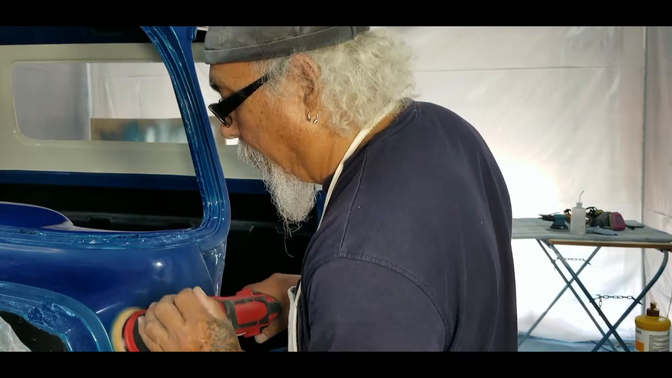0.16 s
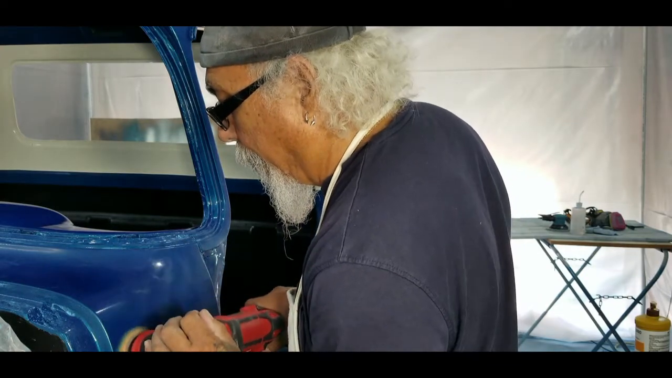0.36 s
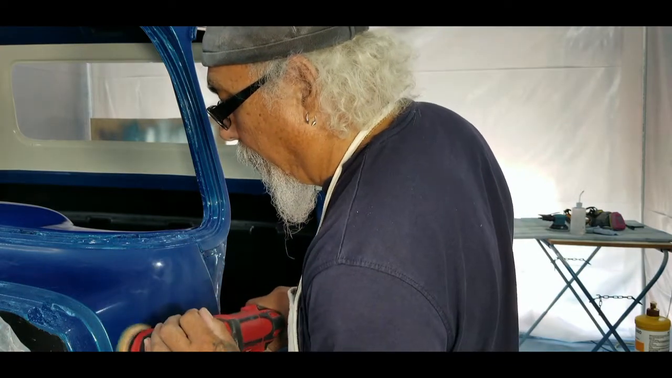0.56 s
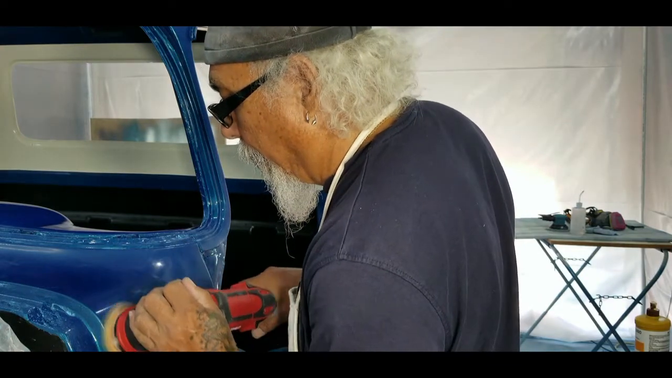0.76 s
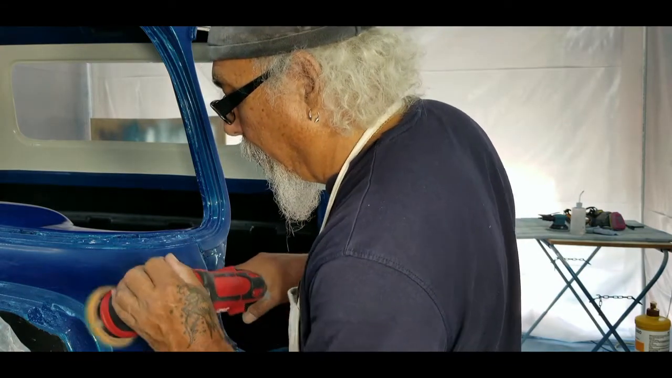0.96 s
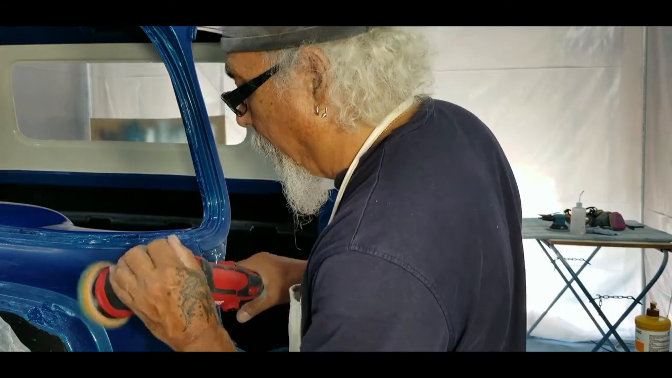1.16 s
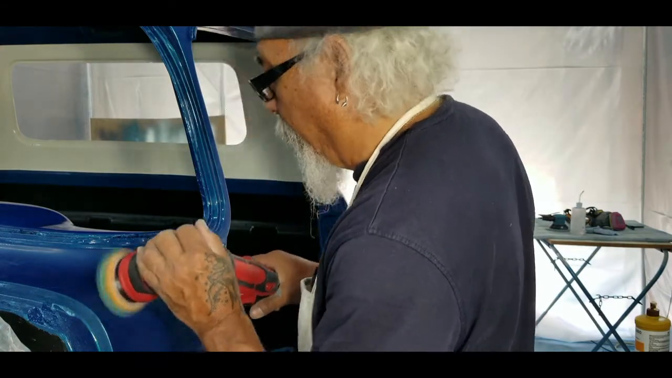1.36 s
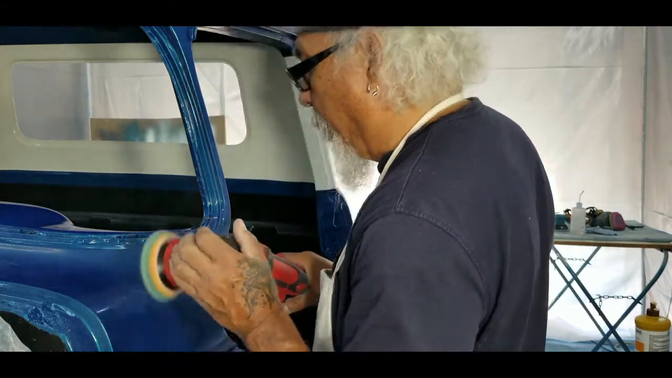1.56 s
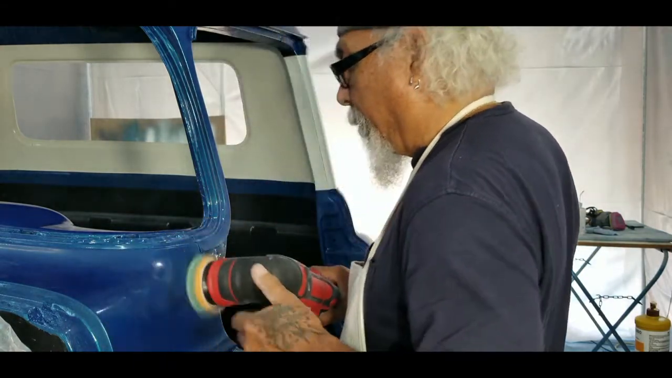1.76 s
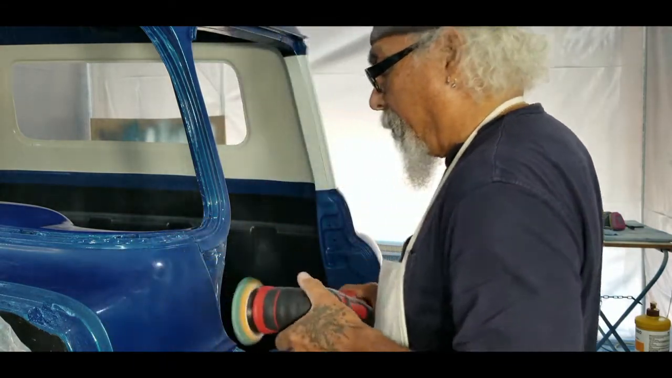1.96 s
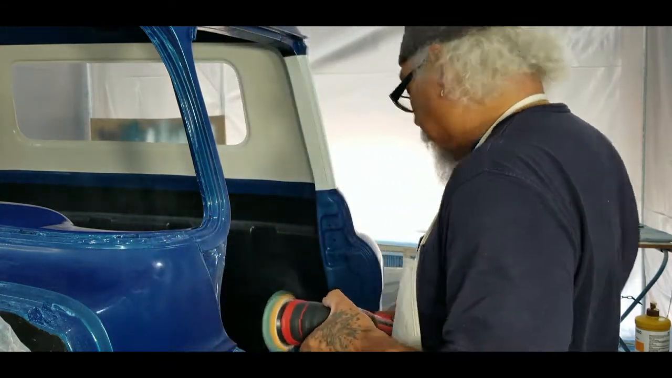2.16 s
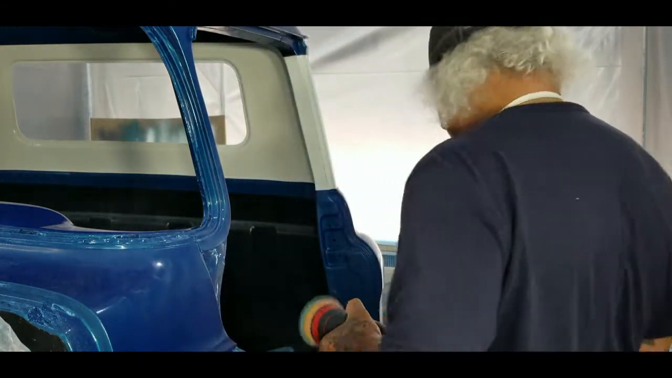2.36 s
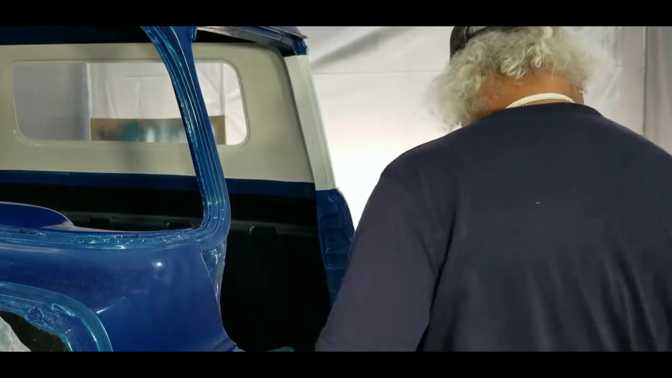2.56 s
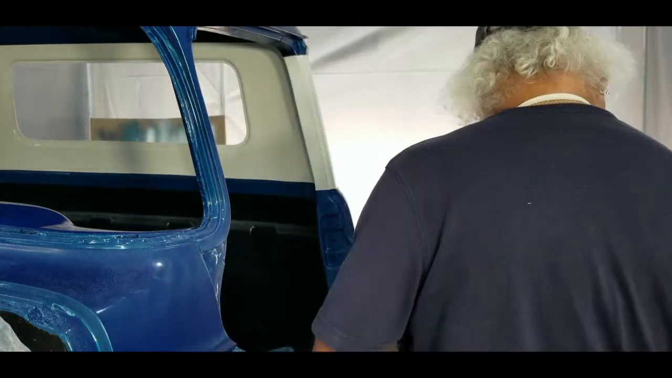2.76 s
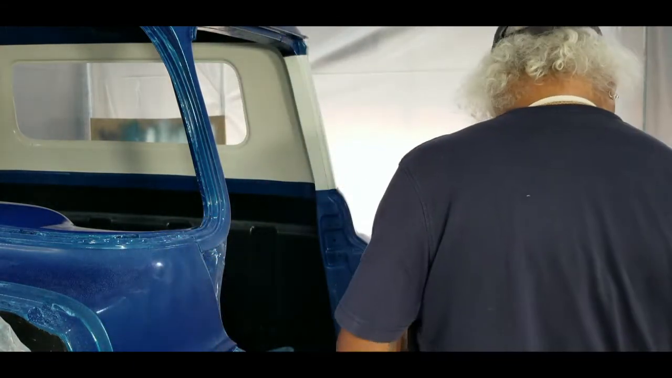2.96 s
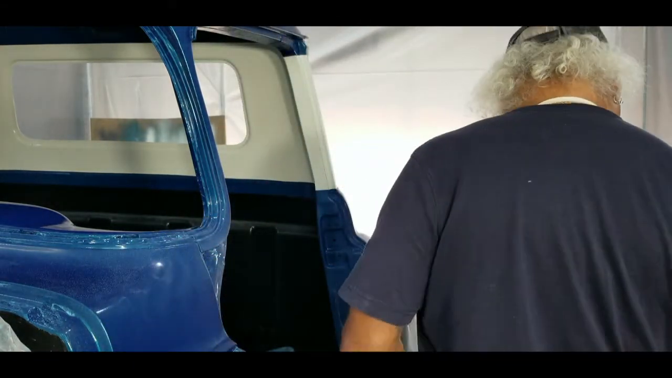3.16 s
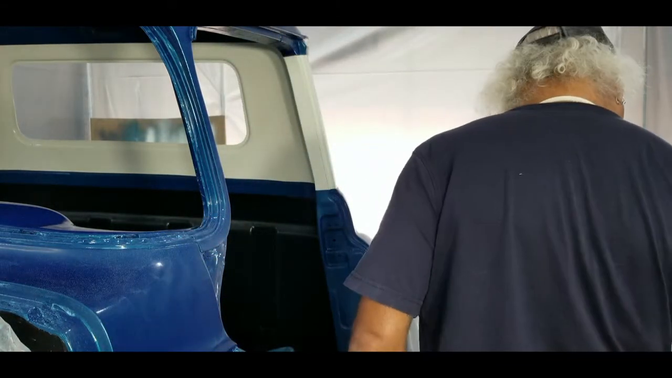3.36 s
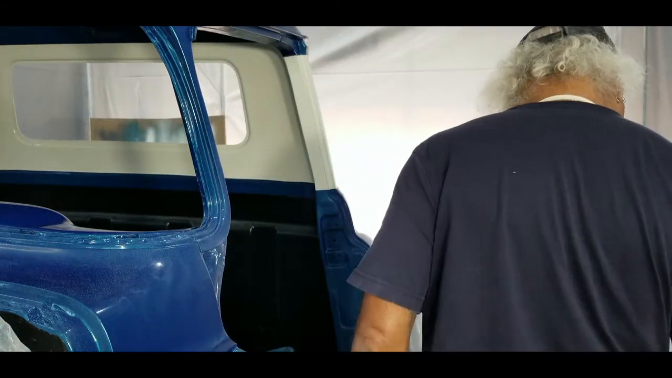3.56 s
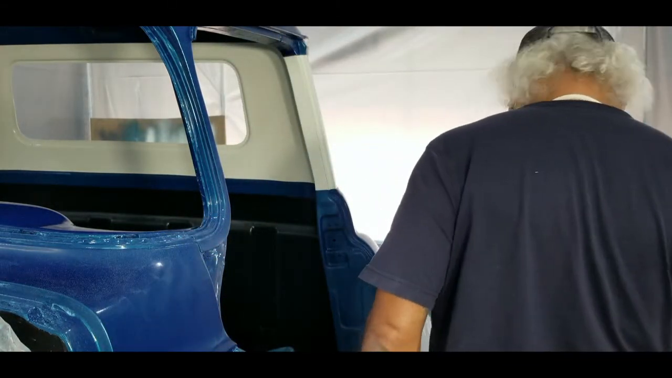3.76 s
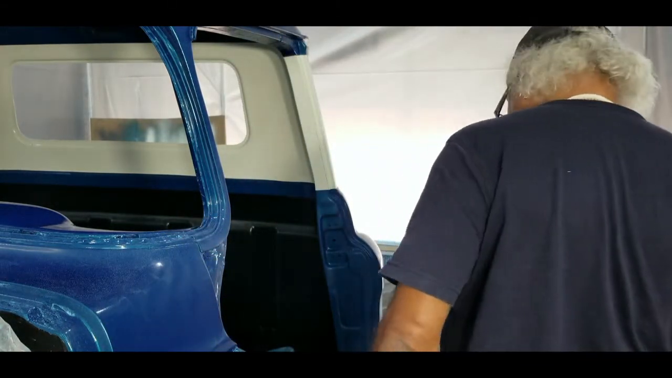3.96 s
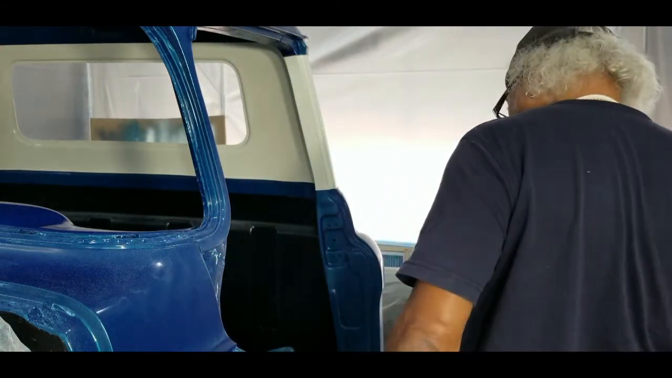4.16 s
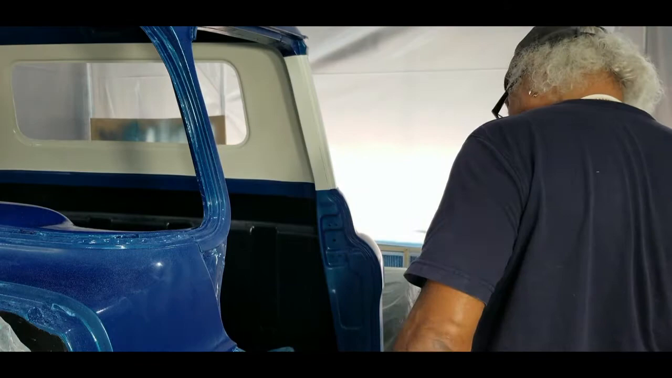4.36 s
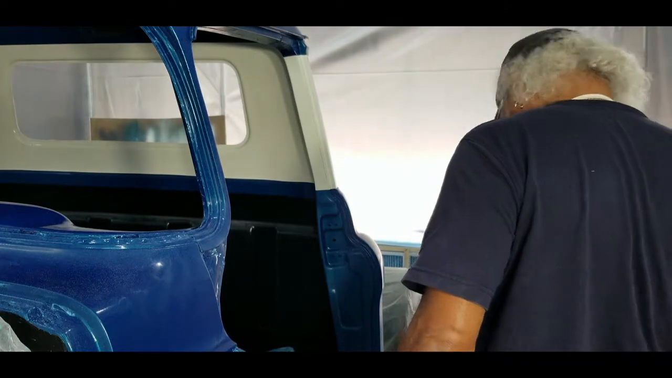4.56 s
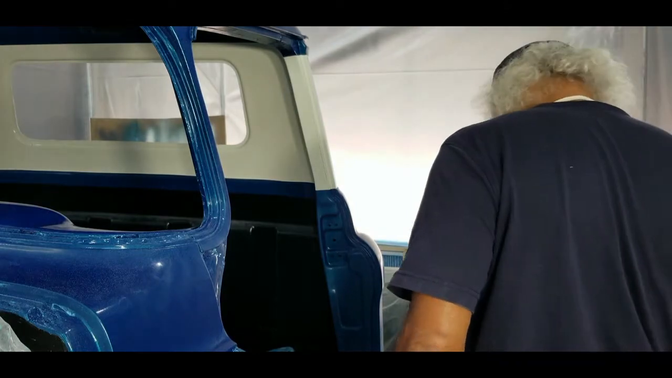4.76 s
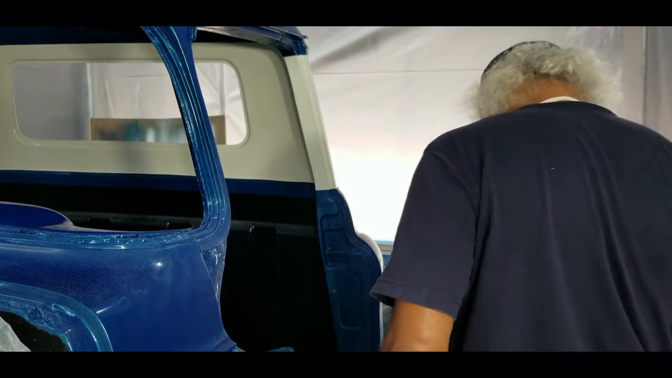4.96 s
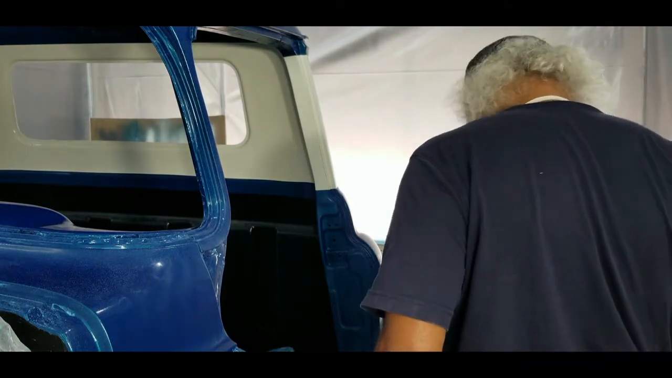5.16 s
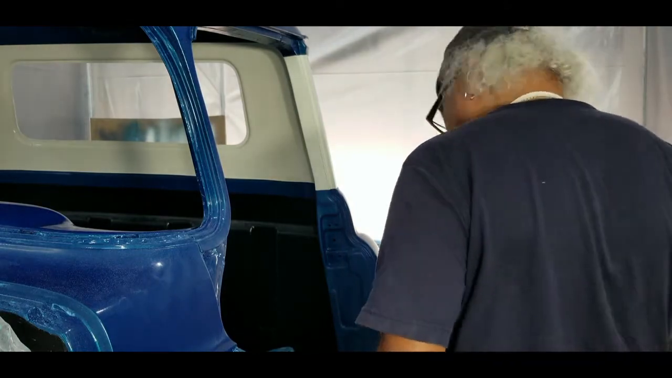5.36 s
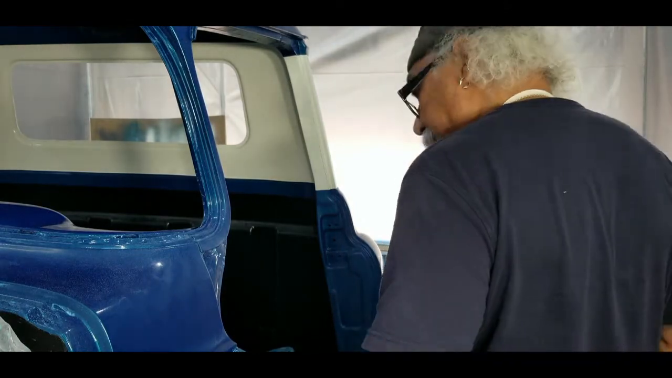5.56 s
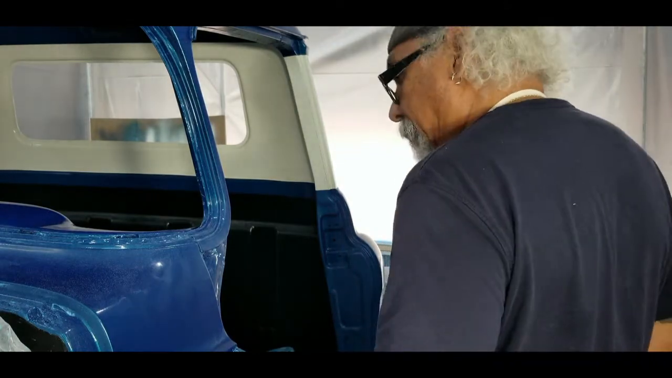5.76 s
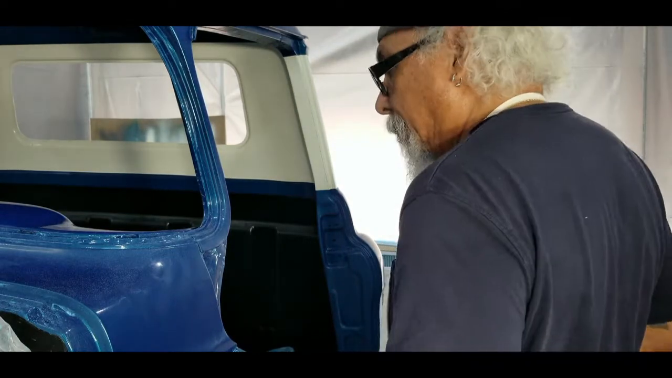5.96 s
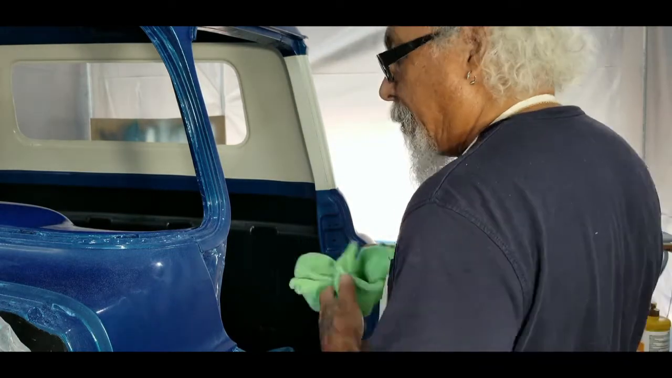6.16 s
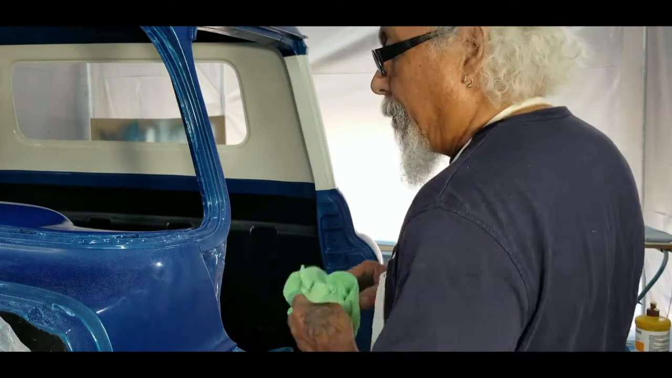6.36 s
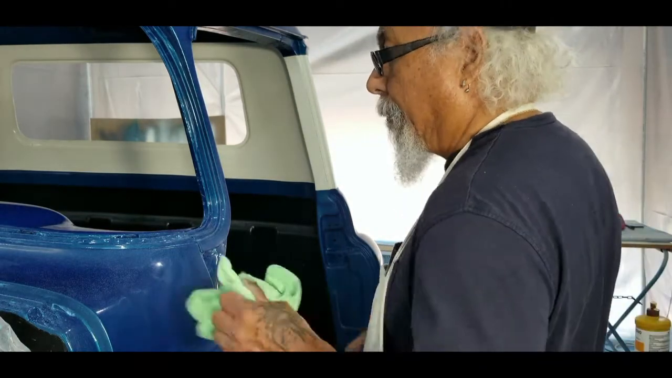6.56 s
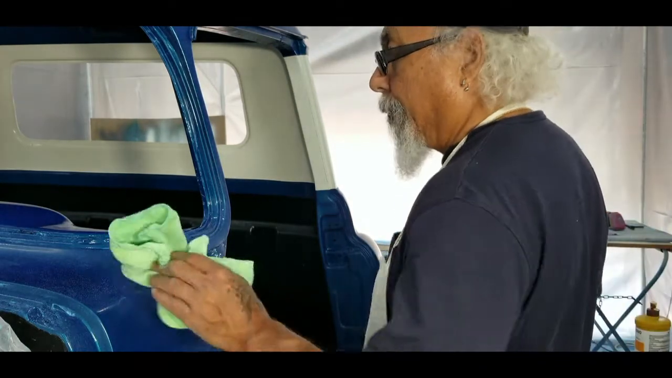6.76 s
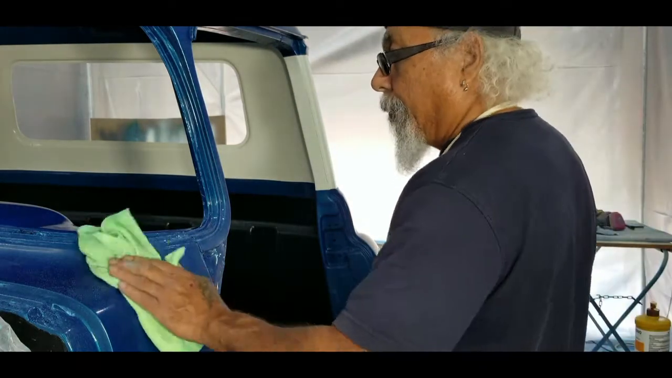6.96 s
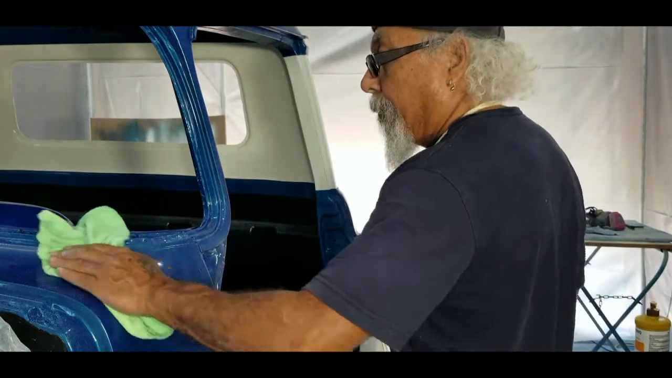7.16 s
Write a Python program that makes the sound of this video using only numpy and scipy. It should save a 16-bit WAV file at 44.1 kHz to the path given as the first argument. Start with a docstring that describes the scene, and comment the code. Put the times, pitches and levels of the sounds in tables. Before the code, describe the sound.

A small electric polisher whines and drums on painted metal, is switched off, whirs down to rest, knocks onto a table, then cloth swishes softly.

```python
"""Orbital polisher coasting to rest

In a workshop a small geared orbital polisher drums on a painted steel panel, is switched off and coasts to rest.
Fan, gears and brushes whine as tones on multiples of the motor speed, over coloured noise for pad, gears and hiss.
The last turns tick one by one; dull knocks of damped table modes follow as the tool is laid down right of centre.
Clothes and a rag swish as swells of grainy noise in the quiet room, over building hum and microphone hiss."""
import sys
import numpy as np
from scipy import signal
from scipy.fft import rfft, irfft, next_fast_len
from scipy.io import wavfile
from scipy.ndimage import uniform_filter1d, map_coordinates

SR = 44100
rng = np.random.default_rng(int(sys.argv[2]) if len(sys.argv) > 2 else 0)


def int16_out(signal):
    """Quantize to a 16-bit WAV file."""
    q = np.round(np.clip(np.atleast_2d(signal).T, -1, 1) * 32767)
    wavfile.write(sys.argv[1], SR, q.astype(np.int16))


N = 317519
TIME = np.arange(N) / SR  # s
PINION_TEETH, WHEEL_TEETH = 10, 41  # the gear pair that slows the motor down to the pad's orbit
OFF_S = 1.1815  # the switch is released

# Tool noise before the hand's sway: t/s, drumming level/dB, gear level/dB, brush hiss level/dB
TOOL_LEVELS = [(0, -33, -31, -35.5), (.1, -29.5, -31, -36), (.7, -30.5, -30.5, -37),
               (.79, -30.5, -32.5, -37), (.84, -31.5, -29.5, -36), (1.24, -31.5, -33, -35.5),
               (1.5, -35, -36, -39), (1.97, -41, -38.5, -43), (2.15, -42.5, -39.5, -47.5),
               (2.42, -47.5, -43, -50.5), (2.6, -53, -43, -50), (2.93, -57, -44.5, -51),
               (3.45, -70.5, -47.5, -49.5), (3.74, -86, -52, -43.5), (3.83, -54, -54, -49),
               (3.93, -79, -62, -52.5), (4.02, -74, -77, -64), (4.1, -80, -86, -75)]
# Where the tool is held: t/s, left over right/dB, extra path to the right microphone/mm
TOOL_PLACE = [(0, -1.5, -2), (.27, -1.5, 0), (.34, -1.5, 13), (.59, -1.5, 14), (.65, -1.5, 27),
              (1.3, -1, 29), (2.4, -2, 52), (2.75, -8, 56), (4.1, -7, 56)]
SWAY_DB = 0.81  # the hand never holds the pad quite still


def polisher():
    """Pad drumming, gear clatter, brush hiss and whines, all tied to the motor speed."""
    speed, pressure = motor()
    turns = np.cumsum(speed) / SR
    orbit = turns * PINION_TEETH / WHEEL_TEETH
    fast = np.clip(speed / speed.max(), 0, 1)
    sway = SWAY_DB * np.array([wobble(12), wobble(12), wobble(9.8)])
    drum_db, gear_db, hiss_db = curves(TOOL_LEVELS) + sway
    pan_db, path_mm = curves(TOOL_PLACE)

    # the body shades treble more than bass, so the hiss leans furthest aside
    drum = sides(.6 * pan_db) * amp(drum_db) * drumming(orbit, fast)
    gears = sides(.9 * pan_db) * amp(gear_db) * gear_clatter(orbit, fast)
    hiss = sides(1.4 * pan_db) * amp(hiss_db) * brush_hiss(turns, fast)
    noise = during(TOOL_LEVELS) * (drum + gears + hiss)

    hums = sides(pan_db) * (orbit_hum(orbit, speed, pressure) + casing_hum())
    scratches = sides(1.6 * pan_db) * ticks(turns, speed)
    sharp = sides(pan_db) * (whines(turns, speed, pressure) + rattle(speed))
    echo = amp(-4.0) * shop(sharp[1])
    return noise + hums + scratches + fan(turns, speed, path_mm) + sharp + echo


# Motor under power: t/s, speed/turns per s, pad pressure/0-1
MOTOR_RUN = [(0, 397.7, 0), (.2, 397.2, .8), (.6, 396.2, 1), (.68, 397.4, .8), (.78, 397.8, .2),
             (1.05, 397.9, .1), (1.13, 398.6, .6), (1.18, 399.5, 0)]
# coasting loses friction + windage * speed^2 turns per s each second
FRICTION, WINDAGE = 121.34, 3.004e-4
# turns per s lost to the paint as the pad lifts off, and the time constant in s
PAD_BRAKE, PAD_BRAKE_S = 18.84, .164


def motor():
    """Speed and pad pressure: held under power, then slowed by friction, air drag and the lifting pad."""
    held, pressure = curves(MOTOR_RUN)
    since_off = np.maximum(TIME - OFF_S, 0)
    scale = np.sqrt(FRICTION / WINDAGE)
    # closed solution of the coasting law
    angle = np.arctan((held[-1] - PAD_BRAKE) / scale) - FRICTION / scale * since_off
    coasting = scale * np.tan(angle) + PAD_BRAKE * np.exp(-since_off / PAD_BRAKE_S)
    return np.where(TIME < OFF_S, held, np.maximum(coasting, 0)), pressure


# Drumming on the paint (full speed) and in the hand (slow): f/Hz, level/dB per Hz, relative
PANEL_SPECTRUM = [(71, -53.5), (120, -29), (140, -40.5), (189, -24.5), (227, -25.5), (280, -16.5),
                  (318, -13.5), (432, -8.5), (667, 2.5), (952, -11), (1200, -11), (1560, -44.5),
                  (2640, -120)]
CASING_SPECTRUM = [(120, -45.5), (200, -19.5), (318, -11.5), (511, -7.5), (649, -2), (771, -2.5),
                   (889, -6.5), (1200, -10), (1560, -31.5), (2640, -120)]


def drumming(orbit, fast):
    """The pad drums as low noise that swells once per orbit."""
    shake = amp(0.5 * np.sin(2 * np.pi * orbit) + 0.98 * wobble(60))
    return blend(patches(1.0, shake), PANEL_SPECTRUM, CASING_SPECTRUM, fast)


# Gear noise at full speed and when slow: f/Hz, level/dB per Hz, relative
GEARS_FAST_SPECTRUM = [(530, -36.5), (900, -7.5), (1110, -8.5), (1430, 0.5), (1630, -1.5), (1960, -3.5),
                       (2080, -5.5), (2350, -5.5), (2680, -3.5), (3320, -6.5), (4120, -2), (4570, -5.5),
                       (4790, -5.5), (6470, -11.5), (8500, -28), (11000, -48), (18700, -120)]
GEARS_SLOW_SPECTRUM = [(530, -38), (900, -10.5), (1220, -19), (1350, -5), (1540, -2), (1960, -5.5),
                       (2240, 5.5), (2700, 1), (3450, 2.5), (5570, 0), (6780, -14), (8500, -22),
                       (11000, -42.5), (18700, -120)]


def gear_clatter(orbit, fast):
    """Gear noise swells once per orbit and is roughened at random."""
    shake = amp(.8 * np.sin(2 * np.pi * orbit) + 0.68 * wobble(70) + 1.4 * wobble(600))
    return blend(patches(2.0, shake), GEARS_FAST_SPECTRUM, GEARS_SLOW_SPECTRUM, fast)


# Brush hiss at full speed and when slow: f/Hz, level/dB per Hz, relative
HISS_FAST_SPECTRUM = [(4120, -33), (7000, -4), (7450, -4), (8050, -9), (8750, -6), (12500, 1),
                      (15100, -9.5), (16100, -10.5)]
HISS_SLOW_SPECTRUM = [(4120, -34.5), (7000, -7), (9580, -14), (10400, -17), (10900, -4.5), (12000, -3.5),
                      (12700, -1.5), (13600, 0), (15100, 0.5), (16100, -12)]


def brush_hiss(turns, fast):
    """The brushes jump once per turn, which pulses their treble hiss."""
    jumping = amp(-2.6 * fast * np.sin(2 * np.pi * turns) + 1.2 * wobble(80) + 1.6 * wobble(700))
    return blend(patches(1.5, jumping), HISS_FAST_SPECTRUM, HISS_SLOW_SPECTRUM, fast)


# How loud each whine leaves the casing at the pitch it has reached: f/Hz, level/dB
# (gear mesh; commutator bars before pressure gain; the octave of the bars)
MESH_RESPONSE = [(1150, -90), (1350, -60), (1620, -64), (1750, -54), (1900, -50), (2100, -47),
                 (2300, -47.5), (2550, -53), (2750, -61), (3700, -62), (3960, -51)]
BAR_RESPONSE = [(1900, -90), (2100, -54), (2360, -65), (2800, -62), (3400, -58), (4150, -58), (4500, -69),
                (4900, -76), (9000, -76), (9500, -63)]
BAR_OCTAVE_RESPONSE = [(10400, -94), (11000, -62), (11900, -54.5), (14000, -56.5), (15200, -72),
                       (16000, -94)]
# Weaker orders at full speed: motor multiple, level/dB
LOADED_ORDERS = [(5, -55), (7, -54.5), (9, -56), (12, -53.5), (30, -53)]
BRUSH_BARS = 24
BAR_PRESS_DB = 11  # gain at full pressure


def whines(turns, speed, pressure):
    """Tones locked to the motor: gear teeth, commutator bars and weaker orders that fade as it slows."""
    loose = 1 - speed / speed.max()  # share of the speed lost
    # the off-centre pad loads the teeth once per orbit
    orbit = turns * PINION_TEETH / WHEEL_TEETH
    mesh_db = along(MESH_RESPONSE, PINION_TEETH * speed) + 2.5 * np.sin(2 * np.pi * orbit)
    mesh = tone(PINION_TEETH * turns, mesh_db, blur=.2 + 1.1 * (1 - loose) ** 5, waver_db=1.5)

    bar_db = along(BAR_RESPONSE, BRUSH_BARS * speed) + BAR_PRESS_DB * pressure
    bars = tone(BRUSH_BARS * turns, bar_db, blur=0.36 + .5 * loose, waver_db=3)
    octave_db = along(BAR_OCTAVE_RESPONSE, 2 * BRUSH_BARS * speed)
    octave = tone(2 * BRUSH_BARS * turns, octave_db, blur=2.5, waver_db=3.0)

    orders = sum(tone(round(k) * turns, db - 90 * loose, blur=0.4, waver_db=0.5) for k, db in LOADED_ORDERS)
    return mesh + bars + octave + orders


# Blade tone while the tool sweeps to and fro under power: t/s, level/dB
FAN_SWEEP = [(0, -35), (.1, -39), (.24, -37), (.38, -28.5), (.56, -30), (.69, -33), (.79, -45), (.91, -33),
             (.99, -44), (1.05, -38), (1.18, -41)]
# Blade tone at the pitch it has reached while coasting: f/Hz, level/dB
FAN_COASTING_RESPONSE = [(5400, -90), (5850, -64), (6250, -53), (7300, -49), (8200, -52), (9250, -55),
                         (10600, -48), (12300, -42)]
FAN_BLADES = 31
FAN_PAN_DB = -2.5  # leans right


def fan(turns, speed, path_mm):
    """The blade tone with a noisy skirt; each microphone hears it over its own path."""
    late_turns = speed * path_mm / 343e3  # sound travels 343e3 mm per s
    blades = FAN_BLADES * (turns - np.outer([0, 1], late_turns))
    coasting_db = along(FAN_COASTING_RESPONSE, FAN_BLADES * speed)
    db = np.where(TIME < OFF_S, curves(FAN_SWEEP)[0], coasting_db)
    loose = 1 - speed / speed.max()
    core = tone(blades, db, blur=0.19 + 4 * loose, waver_db=3.5, apart=0.059)
    skirt = tone(blades, db - 3, blur=0.88, waver_db=4.5)
    return sides(FAN_PAN_DB) * (core + skirt)


# Orbit harmonics: orbit multiple, level/dB, gain at full pressure/dB, loss per tenfold slowing/dB
ORBIT_HARMONICS = [(1, -50.5, 4, 82), (2, -55.5, -9.5, 699.5), (3, -66.5, 22.5, 399.5)]


def orbit_hum(orbit, speed, pressure):
    """The unbalanced pad shakes the tool once per orbit."""
    slowing = np.log10(speed.max() / (speed + 1))
    hum = 0
    for k, db, press_db, loss_db in ORBIT_HARMONICS:
        level_db = db + press_db * pressure - loss_db * slowing
        hum = hum + tone(round(k) * orbit, level_db, blur=.15, waver_db=1.0, apart=0.11)
    return hum


# Narrow hums of the casing, changing with the grip: loudest t/s, level/dB, rise/s, fall/s, f/Hz
GRIP_HUMS = [(2.25, -54.5, .45, 0.44, 618.5), (2.8, -59.5, 0.81, 0.55, 559), (3.4, -68, .6, 1, 650),
             (3.7, -72, 2.1, 0.45, 769)]


def casing_hum():
    """Each casing resonance swells as a steady-pitched tone widened by phase noise."""
    return sum(swell(*row[:4]) * tone(row[4] * TIME, 0, blur=1.02, waver_db=2.5) for row in GRIP_HUMS)


# The hardest gear slaps: t/s, level/dB, relative
HARD_SLAPS = [(1.7153, -30.5), (1.7485, -26.5), (1.8045, -28.5), (2.0847, -25.5), (2.1116, -29.5),
              (2.25, -28), (2.3717, -29), (2.4415, -27.5), (2.463, -24), (2.484, -24), (2.505, -26)]
# weaker slaps at random
SLAPS, SLAP_FROM_S, SLAP_TO_S = 12, 1.69, 2.15
SLAP_DB, SLAP_SCATTER_DB = -31, 1.5  # on the scale of the hard slaps
SLAP_TOP_HZ = 2650  # the gear housing rings no higher


def rattle(speed):
    """Off load the gears slap: short bursts of a few teeth at the mesh rate."""
    out, t = np.zeros(N), np.arange(SR // 60) / SR
    burst = t / .0011 * np.exp(1 - t / .0011)
    slots = (np.arange(SLAPS) + rng.random(SLAPS)) / SLAPS
    weak_s = SLAP_FROM_S + (SLAP_TO_S - SLAP_FROM_S) * slots
    weak_db = SLAP_DB + SLAP_SCATTER_DB * rng.standard_normal(SLAPS)
    for s, db in HARD_SLAPS + list(zip(weak_s, weak_db)):
        hz = min(PINION_TEETH * speed[round(s * SR)], SLAP_TOP_HZ)
        body = np.sin(2 * np.pi * hz * t) + 0.067 * rng.standard_normal(len(t))
        add(out, s, amp(db - 3.0) * burst * body)
    return out


# Extra ticks as the tool is jolted on the table, then bright clicks as it is laid down: t/s, level/dB, low edge
# level/dB, relative
LAST_TICKS = [(3.7989, -30.5, -11), (3.876, -31.5, -14), (3.9, -28.5, -16), (3.9404, -27, -23),
              (3.9669, -30, -23), (4.3974, -47, -13.5), (4.426, -51, -12), (4.475, -45.5, -14)]
TICK_FROM_S, TICK_TURNS = 3.4865, 17  # one tick a turn
TICK_DB, TICK_DB_PER_SPEED, TICK_SCATTER_DB = -25.5, .11, 2  # at rest, loss per turn per s, scatter
TICK_LOW_DB, TICK_LOW_SCATTER_DB = -18, 4  # gain of the low edge


def ticks(turns, speed):
    """Near rest a brush catches once a turn with a short bright scratch; jolts and laying down click alike."""
    bright, lower, t = np.zeros((2, N)), np.zeros((2, N)), np.arange(SR // 25) / SR
    at = np.searchsorted(turns, turns[round(TICK_FROM_S * SR)] + np.arange(TICK_TURNS))
    chance = rng.standard_normal((TICK_TURNS, 2))
    levels = TICK_DB - TICK_DB_PER_SPEED * speed[at] + TICK_SCATTER_DB * chance[:, 0]
    lows = TICK_LOW_DB + TICK_LOW_SCATTER_DB * chance[:, 1]
    for s, db, low_db in LAST_TICKS + list(zip(at / SR, levels, lows)):
        shape = amp(db - 60 * t / 0.024) * (1 - np.exp(-t / .003))
        add(bright, s, shape * rng.standard_normal((2, len(t))))
        add(lower, s, amp(low_db) * shape * rng.standard_normal((2, len(t))))
    # f/Hz, level/dB
    bright_band = [(7000, -19), (9000, 2.5), (16000, 7.0)]
    lower_band = [(3500, -50.5), (5500, 16.5), (8000, 16), (9500, -40.5)]
    return (filtered(bright, lambda hz: amp(along(bright_band, hz)))
            + filtered(lower, lambda hz: amp(along(lower_band, hz))))


# Blows on the table: t/s, level/dB, hardness/dB, t60/s; levels are relative
TABLE_KNOCKS = [(3.779, -46, -12, 0.24), (3.825, -28, -19, 0.13), (3.834, -30, -18, 0.19),
                (4.124, -37, -8.5, 0.17), (4.155, -42.5, -19, 0.18), (4.208, -38, -2.5, 0.15),
                (4.233, -37.5, 2.5, 0.079), (4.269, -59, -14, 0.17), (4.319, -53, -13, 0.22),
                (4.424, -41.5, -4, 0.094), (4.447, -42, -26, 0.089), (4.49, -48, -23, 0.16)]
# Low modes of the table, then its upper modes for hard contact: f/Hz, level/dB, share of t60
LOW_MODES = [(104, -6, 0.79), (148.4, -6, 2.8), (225.5, 0.5, 1.8), (294, -10.5, 1.4)]
UPPER_MODES = [(414.6, 8, 0.32), (606, 1, 0.5), (870, 3, 0.23), (1043, 1, 0.25), (1310, -6.5, 0.38),
               (2600, -12.5, .3)]
# The tool slides and rocks: loudest t/s, level/dB, rise/s, fall/s; levels before panning
TOOL_DRAG = [(3.86, -59, .15, .18), (4.16, -57, .06, .2), (4.24, -51, .06, .13), (4.37, -58, .15, .15),
             (4.435, -57, .04, .14)]
# Colour of the dragging: f/Hz, level/dB per Hz, relative
BOARD_SPECTRUM = [(41, -38), (70, -12), (146, 6), (232, -9.5), (294, -9), (415, -9.5), (552, -18),
                  (613, -11), (2000, -34), (2500, -31), (3250, -63), (5500, -120)]


def knocks():
    """Soft blows ring the low modes of the table, harder ones its upper modes; between them the tool drags."""
    out, t = np.zeros(N), np.arange(SR // 2) / SR
    for s, db, hard_db, t60 in TABLE_KNOCKS:
        ringing = ring(LOW_MODES, t, t60) + amp(hard_db + 4.5) * ring(UPPER_MODES, t, t60)
        add(out, s, amp(db - 13.0) * (1 - np.exp(-t / 0.0016)) * ringing)
    scrape = rush(patches(2.8, amp(3.7 * wobble(40))), BOARD_SPECTRUM, LIKENESS)
    drag = sum(swell(*row) for row in TOOL_DRAG) * scrape
    return sides(-6.5) * (out + amp(-8.0) * shop(out) + drag)


def ring(modes, t, t60):
    """Damped sines, each blow exciting the modes a little differently in level and pitch."""
    total = np.zeros(len(t))
    for hz, level, share in modes:
        decay = amp(level + rng.normal(0, 1.9) - 60 * t / (share * t60))
        total += decay * np.sin(2 * np.pi * hz * rng.normal(1, 0.031) * t)
    return total


# Faint dull taps: t/s, level/dB, f/Hz, t60/s; levels are relative
FAINT_TAPS = [(6.136, -58.5, 422, 0.044), (6.17, -70, 527, 0.086), (6.306, -64.5, 448, 0.036),
              (6.39, -69, 423, 0.089), (6.516, -50, 462, 0.084), (6.535, -48.5, 488, 0.052),
              (6.958, -66.5, 347, 0.37), (6.96, -70, 586, 0.24), (6.964, -60, 1960, 0.068),
              (6.969, -73, 4440, 0.045), (7.092, -55.5, 333, 0.044)]


def taps():
    """Each tap is a short damped tone with a puff of noise."""
    out, t = np.zeros(N), np.arange(SR // 4) / SR
    puff_filter = signal.butter(4, 800, fs=SR)
    for s, db, hz, t60 in FAINT_TAPS:
        puff = amp(-90 * t / t60) * signal.lfilter(*puff_filter, rng.standard_normal(len(t)))
        body = np.sin(2 * np.pi * hz * t) + 3.9 * puff
        add(out, s, amp(db - 2.0 - 60 * t / t60) * (1 - np.exp(-t / 0.00051)) * body)
    return sides(-5) * (out + amp(-10.0) * shop(out))


# Clothes and rag: loudest t/s, level/dB, rise/s, fall/s, treble gain/dB; levels before panning
FABRIC_SWISHES = [(4.1, -71, 0.11, 0.2, 9.5), (4.215, -63, .015, 0.13, -11.5),
                  (4.41, -73, 0.022, .12, 10.5), (4.478, -72.5, .03, .1, 6), (5.51, -63, .11, .12, -4.5),
                  (5.96, -70, .11, 0.11, -1), (6.235, -76, .06, .15, -14), (6.55, -78, .11, .07, -2.5),
                  (6.97, -66.5, 0.046, 0.079, -6), (7.13, -54.5, .055, .8, -11.5)]
# Colour of the fabric: f/Hz, level/dB per Hz, relative
CLOTH_SPECTRUM = [(290, -21), (500, -11), (586, -20), (988, -25), (1160, -16), (1460, -13.5), (2130, -8),
                  (3540, -5.5), (13800, -16), (16000, -20)]


def swishes():
    """Fabric sliding: swells of fine grainy noise, each with its own share of treble."""
    grain = amp(1.0 * wobble(500) + .8 * wobble(50))
    cloth = rush(patches(2.2, grain), CLOTH_SPECTRUM, LIKENESS)
    bright = filtered(cloth, lambda hz: amp(along([(3000, -18), (9000, -1)], hz)))
    levels = np.array([swell(*row[:4]) for row in FABRIC_SWISHES])
    treble = amp([row[4] for row in FABRIC_SWISHES]) @ levels
    return sides(-9.0) * (levels.sum(axis=0) * (cloth - bright) + treble * bright)


# Decay of the workshop: f/Hz, t60/s
SHOP_DECAY = [(150, .45), (1500, 0.87), (12000, 0.27)]


def shop(x):
    """The room's tail: each frequency dies at its own speed."""
    hz, t, z = signal.stft(rng.standard_normal((2, SR // 2)), SR, nperseg=256)
    fading = z * amp(-60 * t / along(SHOP_DECAY, hz)[:, None])
    tail = signal.istft(fading, SR, nperseg=256)[1]
    delayed = np.pad(x, (300, 0))[None]  # samples
    return signal.fftconvolve(delayed, tail / np.linalg.norm(tail[0]), axes=1)[:, :N]


# Colour of the quiet room: f/Hz, level/dB per Hz, relative
AIR_SPECTRUM = [(12, -38), (20, -20), (53, -6.5), (101, -4), (188, -20.5), (229, -29), (681, -35.5),
                (741, -33.5), (1260, -34.5), (1720, -36.5), (4970, -38), (6960, -41), (14400, -38),
                (16100, -46)]
# How alike the two microphones hear the room: f/Hz, likeness/-1 to 1
AIR_LIKENESS = [(60, 0.46), (240, 0.58), (950, -0.23), (3770, -0.03), (15000, 0.099)]
# Gain of the room's bass: t/s, level/dB
BASS_RUMBLE = [(0, 4), (2, -9), (2.45, -13), (2.68, 0.5), (4.3, 1.5), (4.7, -4), (5.5, -0.5), (7.2, 1)]
AIR_DB = -66  # before the bass gain


def room_air():
    """The low hum of the building, its bass rising and falling, over microphone hiss."""
    air = amp(AIR_DB) * sides(-1.8) * rush(patches(.8), AIR_SPECTRUM, AIR_LIKENESS)
    bass = filtered(air, lambda hz: amp(along([(170, -0.5), (300, -29)], hz)))
    return air + (amp(curves(BASS_RUMBLE)[0]) - 1) * bass


# How alike the two microphones hear tool, drag and fabric noise: f/Hz, likeness/-1 to 1
LIKENESS = [(60, 0.94), (150, 0.93), (380, 0.83), (950, 0.61), (2380, 0.12), (5980, -0.13), (15000, -0.043)]


def blend(pair, running, slowing, fast):
    """Noise whose colour crosses from running to slowing with the motor speed."""
    return fast * rush(pair, running, LIKENESS) + (1 - fast) * rush(pair, slowing, LIKENESS)


def rush(pair, spectrum, alike):
    """A noise pair coloured and mixed to stereo, rms 1."""
    def response(hz):
        turn = np.arccos(np.clip(along(alike, hz), -1, 1)) / 2
        return amp(along(spectrum, hz)) * [np.cos(turn), np.sin(turn)]
    mid, side = filtered(pair, response)
    return unit(np.array([mid + side, mid - side]))


def patches(patchy_db, shake=1):
    """Two white noises with random patches of gain, modulated by shake."""
    z = signal.stft(rng.standard_normal((2, N)), nperseg=512)[2]
    across_hz = uniform_filter1d(rng.standard_normal(z.shape[1:]), size=5, axis=0)
    field = uniform_filter1d(across_hz, size=8, axis=1)
    return signal.istft(z * amp(patchy_db * unit(field)), nperseg=512)[1][:, :N] * shake


def tone(turns, db, blur, waver_db, apart=.6):
    """A stereo sine on a phase in turns; phase noise widens it and the channels drift apart."""
    drift = blur * (wobble(40) + .5 * wobble(300)) + apart * np.array([wobble(9.1), wobble(5.8)])
    return np.sqrt(2) * amp(db + waver_db * wobble(25)) * np.sin(2 * np.pi * turns + drift)


def wobble(rate):
    """A smooth random curve, rate knots a second."""
    coarse = TIME[::16]
    knots = rng.standard_normal(int(N * rate / SR) + 4)
    return np.interp(TIME, coarse, map_coordinates(knots, [coarse * rate]))


def swell(peak_s, db, rise_s, fall_s):
    """A rounded gain bump, 38 dB down rise_s before its peak and fall_s after it."""
    return amp(db - 38 * np.maximum((peak_s - TIME) / rise_s, (TIME - peak_s) / fall_s) ** 2)


def filtered(x, response):
    """x times a response of frequency."""
    m = next_fast_len(N + 8192)
    return irfft(rfft(x, m) * response(np.fft.rfftfreq(m, 1 / SR)), m)[..., :N]


def along(points, hz):
    """Interpolate (f/Hz, value) points on a log axis."""
    f, v = np.transpose(points)
    return np.interp(np.log(hz + 1), np.log(f + 1), v)


def curves(rows):
    """One value per sample for each column after the time."""
    s, *cols = np.transpose(rows)
    return [np.interp(TIME, s, c) for c in cols]


def during(rows):
    """1 inside the time span of a table, 0 outside."""
    return (TIME >= rows[0][0]) & (TIME <= rows[-1][0])


def sides(pan_db):
    """Left and right gains; positive leans left."""
    return amp(np.outer([.5, -.5], pan_db))


def amp(db):
    """Gain of a level in dB."""
    return 10 ** (np.asarray(db) / 20)


def unit(x):
    """x at rms 1."""
    return x / np.sqrt(np.mean(x ** 2) + 1e-20)


def add(track, s, sound):
    """Mix a short sound in at time s."""
    part = track[..., round(s * SR):][..., :sound.shape[-1]]
    part += sound[..., :part.shape[-1]]


def scene():
    """Tool, table, taps and fabric over the quiet room."""
    return polisher() + knocks() + taps() + swishes() + room_air()


def record(dry):
    """The microphone chain passes nothing from 15930 Hz up."""
    return filtered(dry, lambda hz: hz < 15930)


dry = scene()
out = record(dry)
int16_out(out)
```